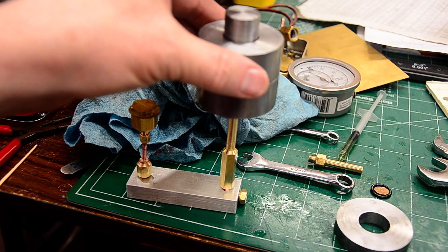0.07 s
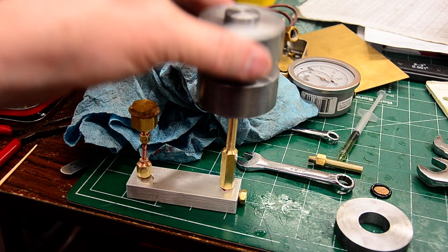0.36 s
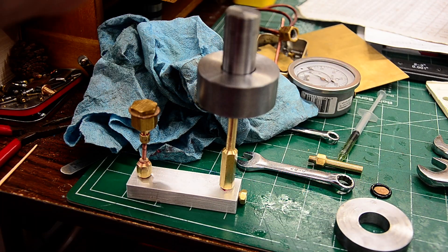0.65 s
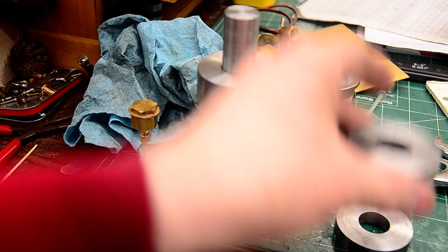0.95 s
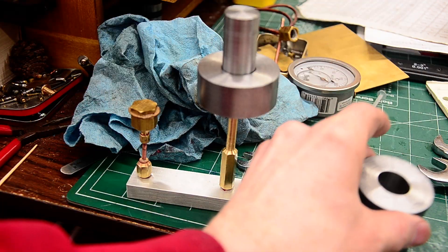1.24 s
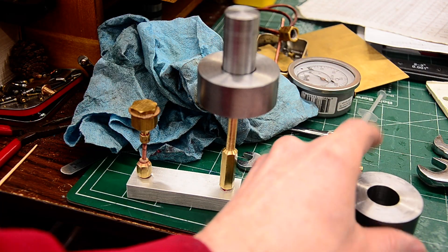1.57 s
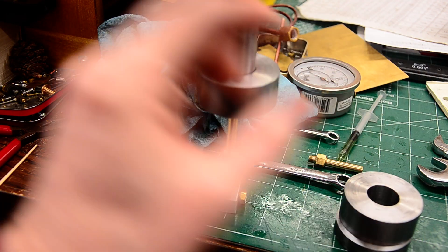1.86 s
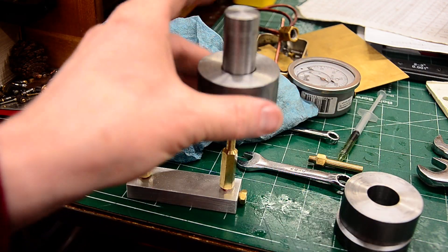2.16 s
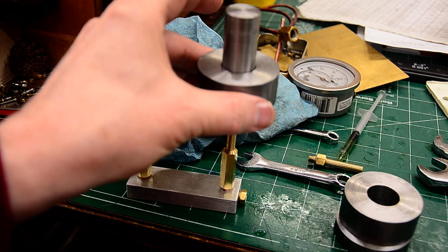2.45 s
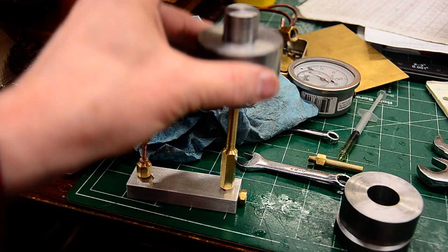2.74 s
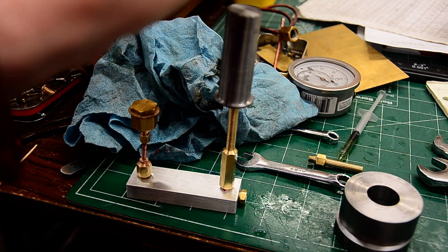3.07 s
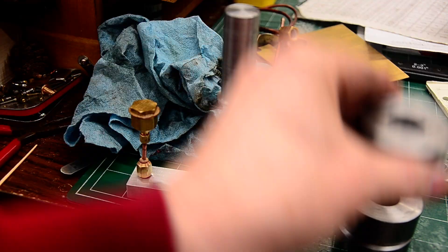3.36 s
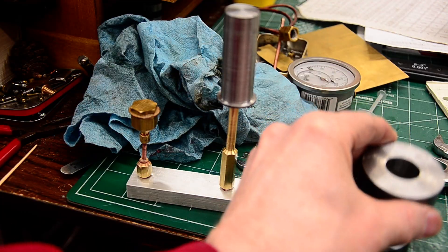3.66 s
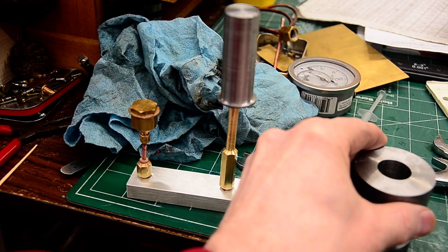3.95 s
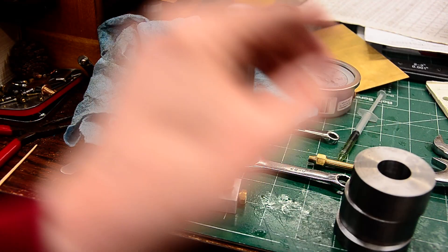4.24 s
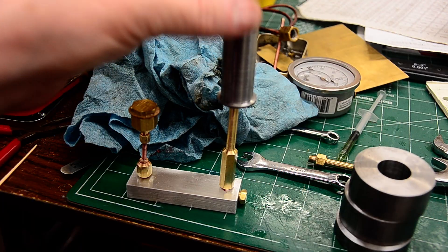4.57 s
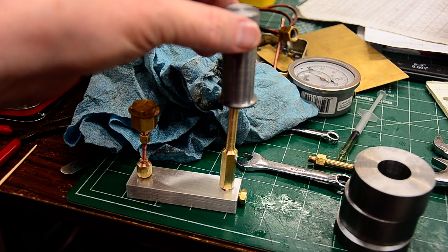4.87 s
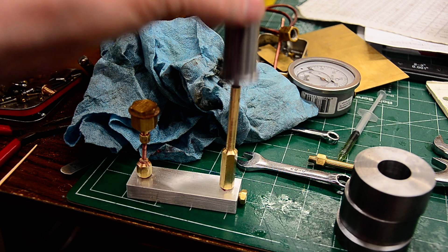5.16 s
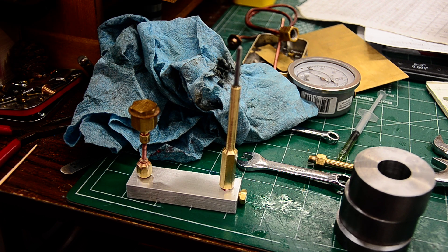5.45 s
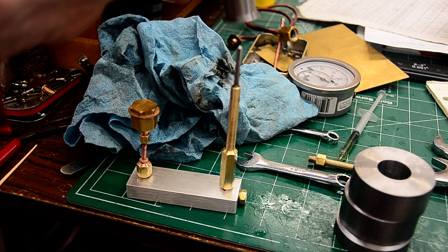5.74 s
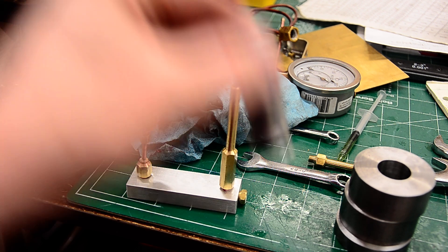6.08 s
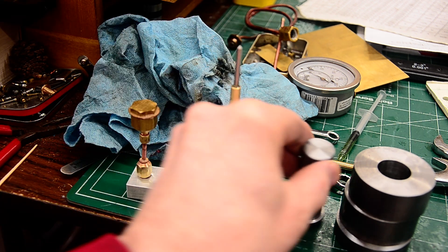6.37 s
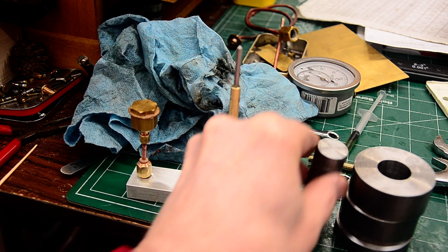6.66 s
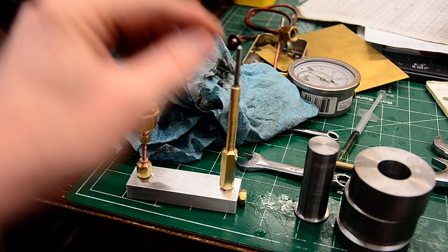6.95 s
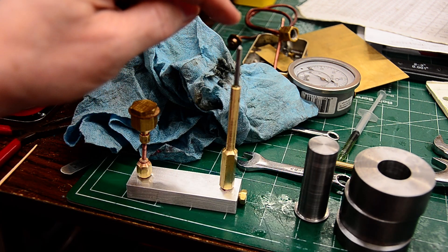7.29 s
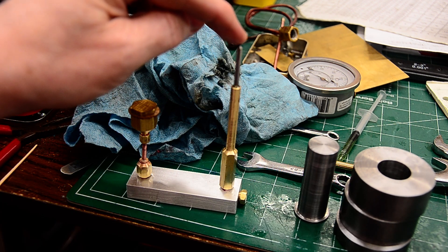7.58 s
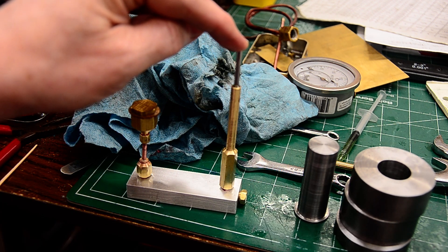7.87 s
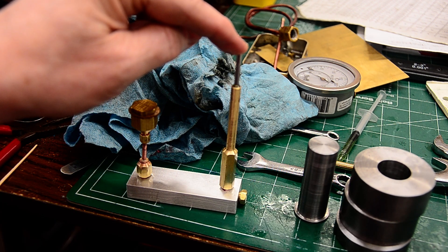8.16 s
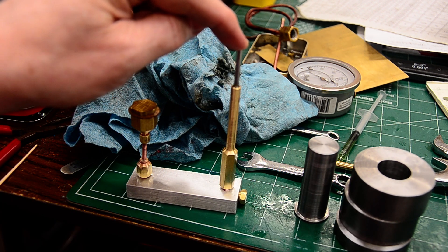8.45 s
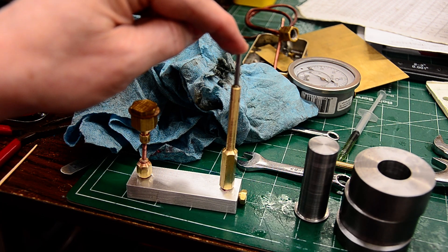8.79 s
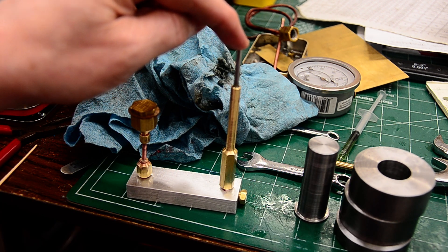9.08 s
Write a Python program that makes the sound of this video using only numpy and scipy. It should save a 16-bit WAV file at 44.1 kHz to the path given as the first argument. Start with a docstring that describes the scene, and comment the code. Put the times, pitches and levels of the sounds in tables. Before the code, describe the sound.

A soft bump opens, then at about 0.3 seconds a steel ring weight scrapes off its sleeve with quick ticks and a clink. At 1.4 seconds it lands on a mat-covered workbench with a loud double clunk, jingling loose tools and rocking briefly to rest. Lighter scrapes and ticks follow from 2.4 to 3 seconds. At 3.7 seconds a second weight clacks sharply onto the first, the loudest moment, with a quick rattle and another knock. Around 5 to 5.3 seconds the sleeve slides off with light ringing clinks, and at 6.5 seconds it is set down with a duller clack. Soft bumps come near 6.8 and 8.5 seconds. The microphone is close, and the small workshop gives each blow a short echo. Quiet ventilation and hum continue throughout, with faint swishes, very soft puffs about once a second and a barely audible high hiss.

```python
"""A small workshop, one microphone close to the steel ring weights of a pressure tester.
The weights are slid off their sleeve and stacked on a mat-covered bench; the sleeve follows.
Steel catches and slips on steel, scraping and clinking, then clunks down and rocks to rest,
shaking the bench and its loose tools. The room answers each blow with a short echo.
Behind it: faint swishes, soft puffs, a very faint high hiss, ventilation and a quiet hum."""
import sys
import numpy as np
from scipy import signal
from scipy.fft import rfft, irfft
from scipy.io import wavfile
from scipy.ndimage import uniform_filter1d

SR = 44100
rng = np.random.default_rng(int(sys.argv[2]) if len(sys.argv) > 2 else 0)


def log_audio(samples):
    """Write samples as a 16-bit WAV file to the path given in sys.argv[1]."""
    # one column per channel
    frames = np.atleast_2d(samples).T
    # limit to full scale, then quantise
    limited = np.clip(frames, -1, 1)
    pcm = np.round(limited * 32767).astype(np.int16)
    wavfile.write(sys.argv[1], SR, pcm)


N = 411012
TIME = np.arange(N) / SR
RING_TIME = TIME[:SR // 2]

# Steel set down or nudged. Each row: start in seconds, level in dB, softening corner in Hz,
# contact tone in Hz, then the relative dB of that tone, steel clack, bench thud and loose tools.
KNOCK_EVENTS = [(0.134, -24, 2500, 1230, 9.5, -18, 6, -30), (1.3526, 3.5, 9200, 1090, 0, -1.5, 1, 8.5),
                (1.4117, 3, 2140, 1370, 2.5, -21, -3, -26), (2.642, -19.5, 1100, 810, 8, -20, -4, -30),
                (3.7165, 6.5, 8000, 1835, 3.5, 9, 0, -2), (3.8676, -1.5, 6840, 1470, 10.5, 5, 0, -23),
                (6.4599, -2.5, 3150, 2010, -16, 3.5, -10, -12), (6.8380, -20.5, 3000, 1190, 1, -14, 6, -17),
                (8.526, -22.5, 1390, 890, -3, -16, -10, -32)]
# A weight rocking to rest. Each row: start and length in seconds, peak level in dB,
# first and last contact tone in Hz.
ROCK_EVENTS = [(1.478, 0.105, -6, 1100, 640), (3.821, 0.125, -3.5, 775, 1610)]
# A weight's bore catching on the sleeve. Each row: start in seconds, level in dB, contact tone in Hz.
CATCH_EVENTS = [(0.3623, -10.5, 5000), (0.441, -17, 4000), (0.4721, -18.5, 4170), (0.479, -15.5, 4000),
                (0.489, -15.5, 3080), (0.515, -18, 3170), (2.6485, -23, 3240), (2.7739, -20.5, 5400),
                (2.9082, -18, 4540), (2.94, -20, 3230), (2.9497, -18.5, 3680)]
# The sleeve knocking on the piston. Each row: start in seconds, level in dB, contact tone in Hz,
# then the relative dB of the sleeve's ring and of its high edge ring.
CLINK_EVENTS = [(0.6869, -13, 3400, -24, -6), (2.411, -20, 2770, -19, -6), (3.0066, -20, 7100, -16, -11),
                (5.0471, -16, 3400, 7, -2), (5.2114, -28, 13000, -5, 8), (5.2230, -31, 13000, -10, 12),
                (5.2338, -30.5, 3000, 13.5, -3), (5.2578, -30.5, 13000, -3, 10)]
# Steel sliding on steel. Each row: start and length in seconds, grit and stand rumble in dB before
# trim, rumble corner in Hz, sleeve ring in dB, slips per second, even hiss as a share of one slip.
SLIDE_STROKES = [(0.318, 0.12, -59, -53.5, 2500, -32, 275, 0.061),
                 (0.447, 0.075, -52, -56, 2500, -21, 170, 0.046),
                 (2.431, 0.18, -75, -58, 1320, -30, 190, 0.088),
                 (2.653, 0.069, -72, -51.5, 850, -30, 190, 0.08),
                 (2.822, 0.11, -64.5, -55, 2500, -10, 240, 0.077),
                 (5.111, 0.17, -56, -63, 3380, -11, 310, 0.11)]
# Faint swishes. Each row: start and length in seconds, first and last pitch in Hz, level in dB.
SWISH_EVENTS = [(2.435, 0.22, 3520, 4400, -64.5), (4.393, 0.14, 2700, 3200, -70.5),
                (4.62, 0.16, 2920, 2900, -68), (5.917, 0.28, 3740, 3210, -69),
                (7.37, 0.13, 3150, 3720, -65.5), (7.692, 0.16, 3710, 3410, -71.5),
                (6.101, 0.13, 2560, 2216, -70), (7.78, 0.12, 2440, 2300, -69.5)]

# Resonances of the struck and rubbed parts. Each row: frequency in Hz, width in Hz, gain in dB.
BOARD_MODES = [(500, 160, 0.5), (663, 98, 1.5), (832, 80, 4.5), (1065, 75, 5), (1242, 47, 0),
               (1670, 460, -1), (1830, 220, 6.5), (2050, 250, 0.5), (2740, 700, -5.5), (3640, 470, -17)]
BENCH_MODES = [(133, 15, 2), (180.6, 7.6, 14), (213.4, 8.1, 7.5), (270.3, 7.3, 12.5), (350, 28, -2),
               (377.4, 12, 4.5), (436.6, 18, 2.5), (493, 7.5, 7.5), (550, 15, -23)]
WEIGHT_MODES = [(2970, 220, -7.5), (3970, 360, 0.5), (5020, 360, 2), (5440, 920, -13), (6740, 460, -7),
                (8300, 280, -15.5), (9200, 570, -13)]
TOOL_MODES = [(1011, 21, 2), (1295, 34, -1), (1624, 40, -3), (2530, 33, -3.5), (2732, 33, 1), (2950, 20, 0),
              (3450, 31, -2), (6130, 56, -13), (7030, 40, -11), (8550, 140, -7), (9280, 74, -8)]
RUB_MODES = [(1536, 96, 0.5), (2940, 780, -3), (3250, 11, 5.5), (3540, 150, -9), (4340, 160, -1.5),
             (4740, 1000, -7), (6610, 170, -8), (7390, 550, -2), (7440, 760, -1), (9100, 320, -18)]
SLEEVE_MODES = [(2900, 200, 2), (3840, 94, 9), (7250, 49, 12), (9470, 80, -10), (12600, 63, -5)]
EDGE_MODES = [(9850, 160, 2.5), (10560, 570, -9), (12300, 390, -12), (13700, 900, -20)]
STAND_MODES = [(463, 120, -5), (644, 88, 0.5), (744, 220, -0.5), (1105, 260, 0.5), (1430, 380, -1.5),
               (1664, 290, -2), (2280, 220, -5.5)]

# The hum in the room. Each row: frequency in Hz, level in dB.
HUM_TONES = [(120, -74), (326, -70)]
# The colour of the ventilation. Each row: frequency in Hz, relative level in dB.
AIR_SPECTRUM = [(30, -26), (55, -6), (100, -8), (150, -8.5), (210, -5.5), (330, -8.5), (480, -8.5),
                (700, -10.5), (1050, -12), (2000, -17.5), (4500, -23.5), (8300, -33), (11000, -37.5),
                (16000, -46)]
# The workshop's echo. Each row: frequency in Hz, seconds to fall by 60 dB.
ROOM_DECAY = [(100, 0.37), (260, 0.24), (700, 0.24), (1840, 0.29), (4850, 0.38), (12800, 0.26)]
# Dips and a peak of the microphone port. Each row: frequency in Hz, width in Hz, gain in dB.
MIC_PORT = [(5640, 340, -14.5), (6860, 130, -2.5), (8170, 860, 4)]


def knocks(crunch_db=-8, crunch_s=0.0043, crunch_hz=7000, tone_width_hz=420,
           clack_send_db=-7, room_db=-3, thud_lag_s=0.00413):
    """Steel meets mat or steel: tiny contacts crunch, the board barks, the bench thuds, tools tingle."""
    out = np.zeros(N)
    board, bench = ring(BOARD_MODES), ring(BENCH_MODES)
    weight, tools = ring(WEIGHT_MODES), ring(TOOL_MODES)
    for start, db, soft_hz, tone_hz, tone_db, clack_db, thud_db, tools_db in KNOCK_EVENTS:
        contacts = rng.standard_normal(len(RING_TIME)) * np.exp(-RING_TIME / crunch_s)
        crunch = amp(crunch_db) * soften(unit(contacts), crunch_hz) / np.sqrt(len(RING_TIME))
        body = board + crunch + amp(tone_db) * pip(tone_hz, tone_width_hz) + amp(tools_db) * tools
        clack = amp(clack_db) * weight
        # the weights are close to the microphone, so their clack is drier than the bench
        echo = amp(room_db) * through(body + amp(clack_send_db) * clack, room())
        add(out, start, amp(db) * soften(body + clack + echo, soft_hz))
        add(out, start + thud_lag_s, amp(db + thud_db) * bench)
    return out


def rocking(swell_s=0.021, swell_db=4, fade_db_per_s=162, first_taps_per_s=135, last_taps_per_s=240,
            glide_power=2.4, width_hz=400, spread_db=2.5, thud_db=-10, room_db=-1):
    """A settling weight's rim taps ever faster; the taps swell and fade as their tone glides."""
    out, bench = np.zeros(N), ring(BENCH_MODES)
    for start, length, peak_db, first_hz, last_hz in ROCK_EVENTS:
        age = 0
        while age < length:
            done = age / length
            hz = last_hz + (first_hz - last_hz) * (1 - done) ** glide_power
            db = peak_db + min(swell_db * (age / swell_s - 1), fade_db_per_s * (swell_s - age))
            force = amp(db + spread_db * rng.standard_normal())
            add(out, start + age, force * (pip(hz, width_hz) + amp(thud_db) * bench))
            taps_per_s = first_taps_per_s + (last_taps_per_s - first_taps_per_s) * done
            age += rng.uniform(.6, 1.4) / taps_per_s
    return out + amp(room_db) * through(out, room())


def clinks(stand_lag_s=0.00336, thud_db=-6, steel_room_db=-13, stand_room_db=1):
    """Bores catch with a tick, the sleeve rings on the piston; blows run down the stand to the bench."""
    steel, blows = np.zeros(N), np.zeros(N)
    rub, sleeve, edge = ring(RUB_MODES), ring(SLEEVE_MODES), ring(EDGE_MODES)
    for start, db, tone_hz in CATCH_EVENTS:
        tick = rub + amp(2) * pip(tone_hz, width_hz=1440)
        add(steel, start, amp(db) * soften(tick, hz=7800))
        add(blows, start + stand_lag_s, [amp(db - 2.5)])
    for start, db, tone_hz, ring_db, edge_db in CLINK_EVENTS:
        tick = rub + amp(0.5) * pip(tone_hz, width_hz=900)
        clink = tick + amp(ring_db) * sleeve + amp(edge_db) * edge
        add(steel, start, amp(db) * soften(clink, hz=14000))
        add(blows, start + stand_lag_s, [amp(db + 4.5)])
    stand = through(blows, ring(STAND_MODES))
    thud = amp(thud_db) * through(blows, ring(BENCH_MODES))
    echo = through(amp(steel_room_db) * steel + amp(stand_room_db) * stand, room())
    return steel + stand + thud + echo


def slides(attack_s=0.0066, release_s=0.0099, spread_db=3, growth_db=0.5,
           trim_db=-3, thud_db=-3, room_db=-5):
    """Turning marks catch and slip: uneven tiny blows ring the steel and shake the stand."""
    out, age = np.zeros(N), TIME[:SR]
    rub, sleeve = ring(RUB_MODES), ring(SLEEVE_MODES) + ring(EDGE_MODES)
    stand = ring(STAND_MODES) + amp(thud_db) * ring(BENCH_MODES)
    for start, length, grit_db, rumble_db, soft_hz, ring_db, slips_per_s, hiss in SLIDE_STROKES:
        contact = np.clip(np.minimum(age / attack_s, (length - age) / release_s), 0, 1)
        # the bore bites harder as it leaves its guide and tilts
        bite_db = growth_db * (np.minimum(age / length, 1) - .5)
        slips = (rng.random(SR) < slips_per_s / SR) * amp(spread_db * rng.standard_normal(SR))
        friction = slips + hiss * rng.standard_normal(SR)
        grit = unit(through(friction, rub + amp(ring_db) * sleeve)) * amp(grit_db + bite_db)
        rumble = unit(soften(through(friction, stand), soft_hz)) * amp(rumble_db)
        add(out, start, amp(trim_db) * contact * (grit + rumble))
    return out + amp(room_db) * through(out, room())


def swishes(half_width_hz=430, flutter_db=2):
    """Faint, narrow bands of noise swell, glide, flutter and fade."""
    out, flutter = np.zeros(N), amp(flutter_db * wander(60))
    for start, length, first_hz, last_hz, db in SWISH_EVENTS:
        done = np.minimum(RING_TIME / length, 1)
        phase = 2 * np.pi * np.cumsum(first_hz + (last_hz - first_hz) * done) / SR
        noise = soften(rng.standard_normal((2, len(RING_TIME))), half_width_hz)
        band = unit(noise[0] * np.cos(phase) + noise[1] * np.sin(phase))
        add(out, start, amp(db) * band * np.sin(np.pi * done))
    return out * flutter


def puffs(first_s=0.342, period_s=0.978, rise_s=0.023, centre_hz=5200, width_hz=2200, db=-68):
    """A very soft hiss comes back about once a second."""
    out = np.zeros(N)
    envelope = RING_TIME / rise_s * np.exp(1 - RING_TIME / rise_s)
    for start in np.arange(first_s, TIME[-1], period_s):
        hiss = unit(through(rng.standard_normal(len(RING_TIME)), pip(centre_hz, width_hz)))
        add(out, start, amp(db) * hiss * envelope)
    return out


def faint_hiss(centre_hz=7500, width_hz=6000, db=-81, waver_db=2, end_s=7.4, fade_s=0.27):
    """A very faint, wavering high hiss that fades out at about 7.4 s."""
    hiss = unit(through(rng.standard_normal(N), pip(centre_hz, width_hz)))
    fade = np.clip((end_s - TIME) / fade_s, 0, 1)
    return hiss * amp(db + waver_db * wander(2.1)) * fade


def room_tone(air_db=-63, waver_db=2, drift_rad_per_hz=0.0045):
    """Steady ventilation noise and a wavering hum lie behind everything."""
    colour = amp(at_hz(np.fft.rfftfreq(N, 1 / SR), AIR_SPECTRUM))
    out = amp(air_db) * unit(irfft(rfft(rng.standard_normal(N)) * colour, N))
    for hz, db in HUM_TONES:
        level = np.sqrt(2) * amp(db + waver_db * wander(4.7))
        drift = drift_rad_per_hz * hz * wander(7)
        out += level * np.sin(2 * np.pi * hz * TIME + drift)
    return out


def room(gap_s=0.0029, build_s=0.00065, treble_db=-3, shelf_hz=4000):
    """The workshop's short, diffuse echo: half-octave bands of noise, each dying at its own rate."""
    size = len(RING_TIME)
    spectrum, hz = rfft(rng.standard_normal(size)), np.fft.rfftfreq(size, 1 / SR)
    age = np.maximum(RING_TIME - gap_s, 0)
    onset = 1 - np.exp(-age / build_s)
    out = np.zeros(size)
    for centre in 125 * 2 ** (np.arange(15) / 2):
        inside = np.abs(np.log2((hz + 1) / centre)) < 1 / 4
        decay = 1000 ** (-age / at_hz(centre, ROOM_DECAY))
        band = unit(irfft(spectrum * inside, size) * onset * decay)
        shelf = amp(treble_db * centre / (centre + shelf_hz))
        out += band * np.sqrt(inside.mean() / size) * shelf
    return out


def ring(modes):
    """Impulse response of damped modes; neighbours swing in opposite directions."""
    out = 0
    for k, (hz, width, db) in enumerate(modes):
        gain = (-1) ** k * amp(db) * 2 * np.pi * width / SR
        out += gain * np.exp(-np.pi * width * RING_TIME) * np.sin(2 * np.pi * hz * RING_TIME)
    return out


def pip(hz, width_hz):
    """A rounded pip: one resonance applied twice."""
    once = ring([(hz, width_hz, 0)])
    return through(once, once)


def soften(x, hz):
    """Take away the treble, as a longer contact does."""
    return signal.sosfilt(signal.butter(2, hz, fs=SR, output="sos"), x)


def wander(turns_per_s):
    """A smooth random curve with rms 1."""
    hold = int(SR / turns_per_s)
    steps = np.repeat(rng.standard_normal(N // hold + 1), hold)
    return unit(uniform_filter1d(steps, hold)[:N])


def amp(db):
    """Decibels to gain."""
    return 10 ** (np.asarray(db) / 20)


def unit(x):
    """Scale to rms 1."""
    return x / np.sqrt(np.mean(x ** 2))


def add(out, start_s, x):
    """Mix x into out from start_s."""
    start = int(start_s * SR)
    out[start:start + len(x)] += x[:N - start]


def through(x, response):
    """Pass x through an impulse response."""
    return signal.fftconvolve(x, response)[:len(x)]


def at_hz(hz, points):
    """Read (Hz, value) points on a log-frequency axis."""
    point_hz, values = np.transpose(points)
    return np.interp(np.log(np.maximum(hz, 1)), np.log(point_hz), values)


def scene(bass_hz=110):
    """All sources at one microphone; small objects radiate little deep bass."""
    handling = knocks() + rocking() + clinks() + slides()
    handling = signal.sosfilt(signal.butter(3, bass_hz, "high", fs=SR, output="sos"), handling)
    return (handling + swishes() + puffs() + faint_hiss() + room_tone())[None]


def record(dry, ceiling_db=-5.5, top_hz=15900):
    """The microphone port colours the treble, the sharpest peaks are rounded and the top is cut."""
    for hz, width, db in MIC_PORT:
        band = signal.lfilter(*signal.iirpeak(hz, hz / width, fs=SR), dry)
        dry = dry + (amp(db) - 1) * band
    rounded = amp(ceiling_db) * np.tanh(dry / amp(ceiling_db))
    return signal.sosfilt(signal.ellip(10, .1, 80, top_hz, fs=SR, output="sos"), rounded)


dry = scene()
out = record(dry)
log_audio(out)
```